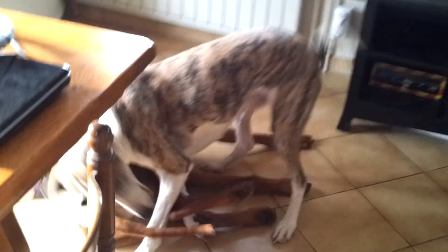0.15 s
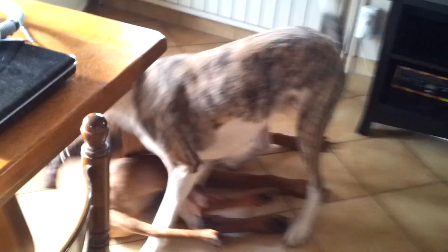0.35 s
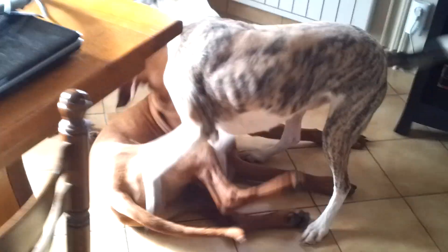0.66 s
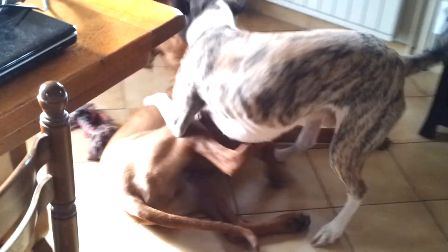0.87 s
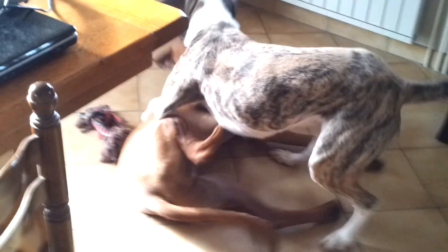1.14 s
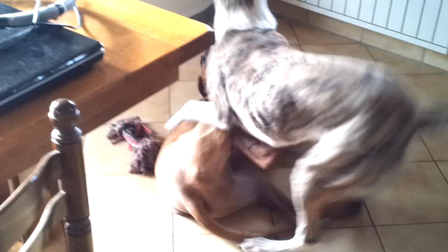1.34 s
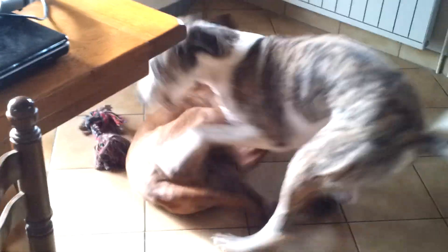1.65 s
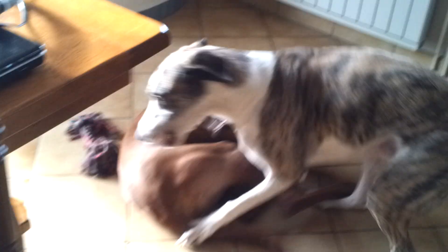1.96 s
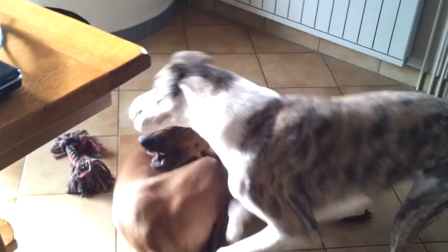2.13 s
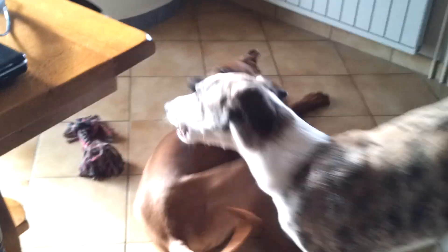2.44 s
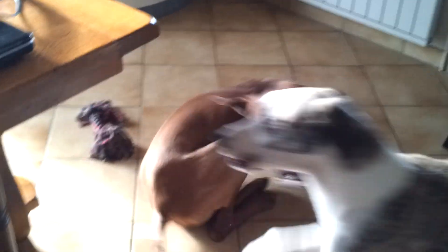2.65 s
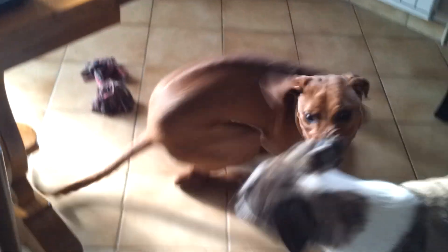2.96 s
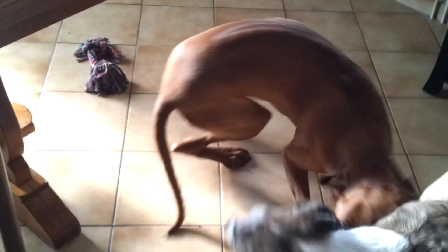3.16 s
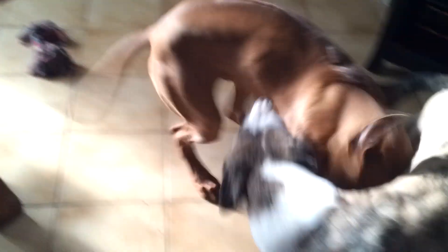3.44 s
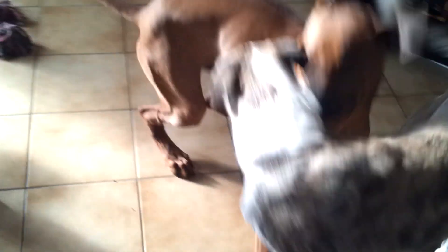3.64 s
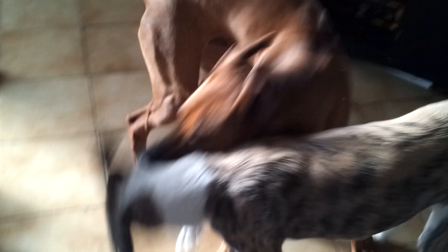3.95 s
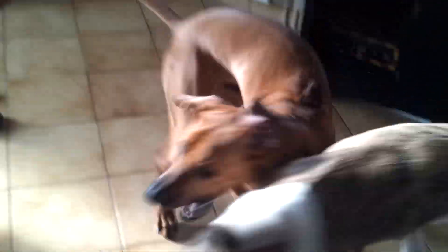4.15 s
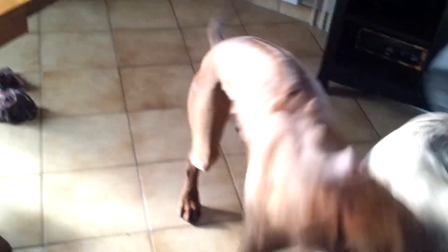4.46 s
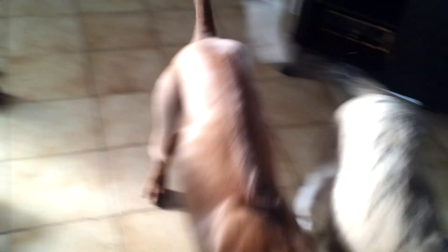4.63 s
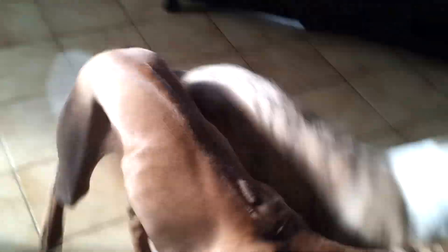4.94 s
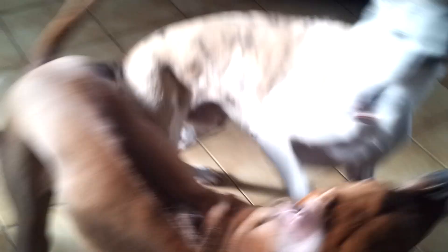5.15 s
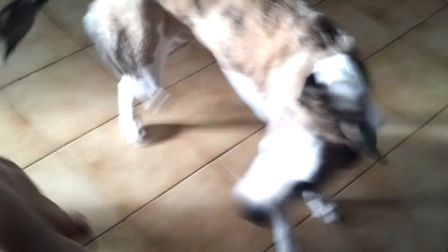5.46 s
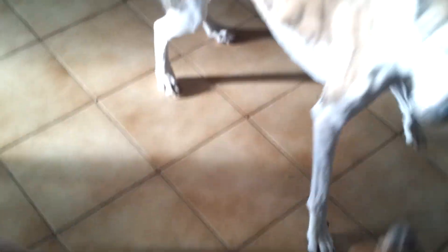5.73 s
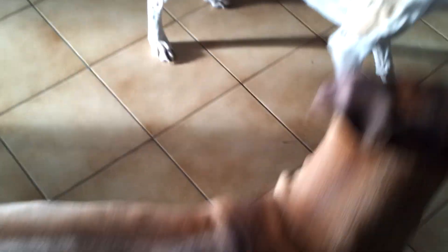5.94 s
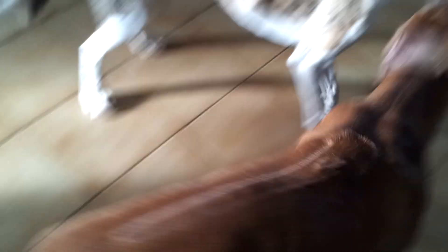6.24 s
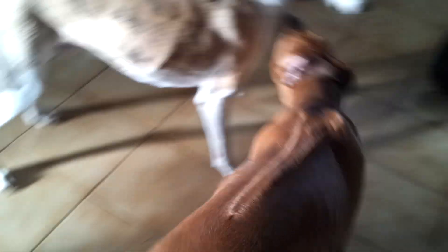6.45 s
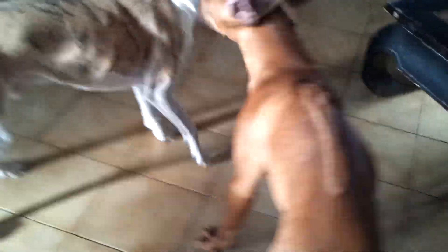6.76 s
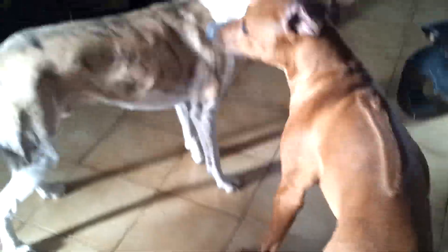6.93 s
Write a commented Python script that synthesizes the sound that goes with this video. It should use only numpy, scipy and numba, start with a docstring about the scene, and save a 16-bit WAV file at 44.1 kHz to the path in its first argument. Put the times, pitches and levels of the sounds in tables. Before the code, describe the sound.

Two dogs wrestle on a tiled floor in a hard, reverberant room, close to the microphone, over faint hiss, coat rustle and low handling rumble. The first second is fairly quiet, with light claw steps, small skids and a short huff around 0.7. A sharp claw click lands near 1.4, then a rough, low growl flutters from 1.65 to 1.9, with a fainter one just after 2. Whiny huffs cluster between 2.1 and 2.9 while claws click loudly and scrape from 2.3 to 4, with soft thumps around 2.6 to 3.2. Another growl rattles at 3.8 to 4.2, amid huffs and a brief whine. Sharp claw ticks and thumps continue near 4.7. At 5.13 a short yelping whine meets a growl that swells into one very loud, two-heave bark at about 5.3 to 5.5, distorted and ringing. Afterwards the echo fades, with scattered claws, a low thump near 6.3 and weak huffs until 7.

```python
"""Two dogs wrestle on a tiled floor in a hard, ringing room, close to the microphone.
Over faint hiss and rustling coats come light steps, huffs, whines and soft thumps, mixed together.
Claws click, noise bursts skid over the tile; rough pulses through a mouth make the growls.
Past five seconds a growl swells into a loud bark, pulses through wide jaws, which overloads
the microphone and rings in the room; the tussle then goes on and dies down."""
import sys
import numpy as np
from scipy import signal
from scipy.fft import rfft, irfft
from scipy.io import wavfile
from numba import njit

SR = 44100
rng = np.random.default_rng(int(sys.argv[2]) if len(sys.argv) > 2 else 0)


def wav_out(sig):
    """Save sig, one row per channel (or a flat mono array), as 16-bit PCM at SR to the path in sys.argv[1]."""
    wavfile.write(sys.argv[1], SR, np.round(np.clip(np.atleast_2d(sig).T, -1, 1) * 32767).astype(np.int16))


N = 312974  # length [samples]
TIME = np.arange(N) / SR  # [s]


def undb(db):
    """Decibels to an amplitude factor."""
    return 10 ** (np.asarray(db) / 20)


def unit(x):
    """Scale to rms 1."""
    return x / np.sqrt(np.mean(x ** 2) + 1e-18)


def add(out, s, sound):
    """Mix a sound in at time s."""
    start = max(int(s * SR), 0)
    out[start:start + len(sound)] += sound[:max(N - start, 0)]


def colour(x, points):
    """Shape a sound with a spectrum of (frequency [Hz], gain [dB]) points."""
    hz, db = np.transpose(points)
    bins = np.maximum(np.fft.rfftfreq(len(x), 1 / SR), 1)
    gain_db = np.interp(np.log(bins), np.log(hz), db)
    return irfft(rfft(x) * undb(gain_db), len(x))


@njit
def svf(x, g, k):
    """State-variable band-pass whose centre and width may move."""
    y, band, low = np.empty(len(x)), 0., 0.
    for i in range(len(x)):
        # the 1e-18 keeps the filter away from very small numbers in silence
        v = (band + g[i] * (x[i] + 1e-18 - low)) / (1 + g[i] * (g[i] + k[i]))
        band, low, y[i] = 2 * v - band, low + 2 * g[i] * v, k[i] * v
    return y


def resonate(x, hz, width_hz):
    """One resonance, gain 1 at its centre."""
    hz = np.minimum(hz, SR * .45) * np.ones(len(x))
    return svf(x, np.tan(np.pi * hz / SR), width_hz / hz)


def throat(x, modes):
    """Parallel resonances of alternating sign."""
    out = 0
    for k, (hz, width, db) in enumerate(modes):
        out = out + (-1) ** k * undb(db) * resonate(x, hz, width)
    return out


def highpass(x, hz):
    """Remove what lies below hz."""
    return signal.sosfilt(signal.butter(4, hz, "high", fs=SR, output="sos"), x)


def grains(count, rate, spread_db):
    """Random tiny impacts of uneven size, rate per second on average."""
    hit = rng.random(count) < rate / SR
    sign = rng.choice([-1, 1], count)
    size = undb(spread_db * np.clip(rng.standard_normal(count), -2, 2))
    return unit(hit * sign * size)


def swell(length, attack):
    """Envelope that rises quickly, holds for about its length [s] and dies away."""
    t = np.arange(int(2 * max(length, .005) * SR)) / SR
    return (1 - np.exp(-t / attack)) * np.exp(-(t / length) ** 3)


def fade(x, length):
    """Ease a call in and out over length [s]."""
    t = TIME[:len(x)]
    return x * np.minimum(np.minimum(t, t[::-1]) / length, 1)


def controls(table):
    """Sample a curve table's columns over its own span."""
    s, *columns = np.transpose(table)
    t = np.arange(s[0], s[-1], 1 / SR)
    return [np.interp(t, s, c) for c in columns]


def larynx(hz, jitter, shimmer_db, limp, breath):
    """Uneven glottal pulses, alternately strong and weak, each followed by a puff of air."""
    chance = rng.standard_normal((256, 2))
    cycle = (np.cumsum(hz) / SR).astype(int)
    phase = np.cumsum(hz * np.exp(jitter * chance[cycle, 0])) / SR
    cycle = phase.astype(int)
    size = undb(shimmer_db * chance[cycle, 1]) * (1 + limp * (-1.) ** cycle)
    pulses = np.diff(cycle, prepend=0) * size
    puff = np.exp(-(phase % 1) / 0.46)
    air = rng.standard_normal(len(hz)) * puff * size
    return unit(pulses) + breath * unit(air)


# faint, steady room noise: (frequency [Hz], relative density [dB per Hz])
HISS_COLOUR = [(15, -36), (25, -1.5), (298, -1), (340, -12), (386, 6), (1010, -8), (1770, -3.5), (3050, -6),
               (5820, -6), (12000, -15.5), (15600, -40), (22000, -120)]


def hiss():
    """The quiet room around the microphone: steady coloured noise."""
    return unit(colour(rng.standard_normal(N), HISS_COLOUR)) * undb(-57)


# how hard the dogs tussle, which sets the rustle and the light steps: (time [s], level [dB])
TUSSLE = [(0.0, -59), (0.51, -62.5), (1.38, -48), (1.72, -55), (1.82, -43), (2.19, -48), (3.12, -42.5),
          (3.76, -50), (4.09, -44.5), (4.27, -52), (4.66, -53), (4.78, -43.5), (5.14, -50.5), (5.34, -58),
          (5.46, -34), (6.07, -59.5), (6.62, -47), (7.1, -65)]


def tussle_db(t):
    """Level of the tussle at time t."""
    return np.interp(t, *np.transpose(TUSSLE))


# tone of the rubbing coats, with low rumble of the handled microphone: (frequency [Hz], gain [dB])
FUR_COLOUR = [(40, 8), (150, 3.5), (400, 1), (1000, -4), (2400, -4.5), (3800, -5.5), (6500, 1.5),
              (11000, -13.5)]
FUR_DB = 6.5  # above the tussle level


def fur():
    """Fine rustle of coats rubbing and low rumble of the handled microphone, as many tiny impacts."""
    rustle = colour(grains(N, rate=2000, spread_db=-2.0), FUR_COLOUR)
    return unit(rustle) * undb(tussle_db(TIME) + FUR_DB)


STEPS_PER_S, STEP_HZ, STEP_SKID_S = 8.8, 7040, 0.066  # mean rate, middle claw ring [Hz], skid length [s]
STEP_CLAW_DB, STEP_SKID_DB = 14, -2  # relative to the tussle level, before each step's own scatter


def light_steps():
    """Rows like PAWS for the shuffling in between: uneven in time, louder as the tussle grows."""
    chance = rng.random((100, 3))
    times = (np.arange(len(chance)) + chance[:, 0]) / STEPS_PER_S
    levels = tussle_db(times) + 5 * (chance[:, 1] - .5)
    rings = STEP_HZ * 2 ** (0.33 * (chance[:, 2] - .5))
    return [(s, db + STEP_CLAW_DB, hz, db + STEP_SKID_DB, STEP_SKID_S)
            for s, db, hz in zip(times, levels, rings) if s < N / SR]


# a dog huffs or whines, levels before the room:
# (time [s], length [s], level [dB], mouth resonance [Hz], whine share [0-1])
HUFFS = [(.01, 0.056, -50.5, 930, 0.2), (.701, 0.037, -35, 616, 0.18), (1.069, 0.23, -47, 990, 0.08),
         (1.553, 0.033, -36, 850, .2), (1.633, 0.071, -35.5, 920, 0.01), (2.102, 0.029, -36, 1337, 0.6),
         (2.129, 0.049, -37, 900, 0.8), (2.37, 0.099, -34, 999, 0.73), (2.414, 0.22, -38.5, 1070, 0.15),
         (2.672, 0.056, -29, 930, 0.72), (2.789, 0.092, -41.5, 886, 0.4), (2.879, 0.053, -31, 756, 0),
         (3.54, 0.05, -36, 790, 0), (3.78, 0.032, -32, 1023, 0.1), (4.107, 0.056, -34, 1096, 1),
         (4.175, 0.097, -34.5, 1210, 0), (4.365, 0.031, -39, 793, 0), (4.471, 0.0287, -36, 873, 0),
         (4.575, .15, -37.5, 756, 0.03), (4.9, 0.048, -34, 710, 0), (5.051, 0.052, -35.5, 766, 0),
         (5.125, 0.019, -19.5, 856, .95), (6.273, 0.13, -42.5, 810, 0), (6.686, .17, -45, 880, 0)]
# upper resonances of a huff: (frequency [Hz], width [Hz], gain [dB])
HUFF_THROAT = [(1880, 190, 11.5), (2500, 280, 3.5)]
UPPER_DB, UPPER_WHINE_DB = -6.5, -26  # upper resonances in a plain huff, and their change in a pure whine


def huffs():
    """Fluttering air rings the dog's mouth; when the throat tightens it narrows into a thin, sagging whine."""
    out, air = np.zeros(N), grains(N, rate=3000, spread_db=1.5)
    for s, length, db, hz, whine in HUFFS:
        whine = np.clip(whine, 0, 1)
        upper_db = UPPER_DB + UPPER_WHINE_DB * whine
        shape = swell(length, attack=0.0055 + 0.0087 * whine)
        flow = np.roll(air, -int(s * SR))[:len(shape)]
        bent_hz = hz * np.linspace(1.04, .9, len(shape))
        mouth = unit(resonate(resonate(flow, bent_hz, width_hz=900), bent_hz, width_hz=680))
        tone = unit(resonate(resonate(flow, bent_hz, width_hz=58), bent_hz, width_hz=140))
        upper = unit(resonate(throat(flow, HUFF_THROAT), 2200, width_hz=1700))
        chest = unit(resonate(resonate(flow, 534, width_hz=100), 373, width_hz=120))
        huff = np.sqrt(1 - whine) * (mouth + undb(-7) * chest)
        sound = huff + np.sqrt(whine) * tone + undb(upper_db) * upper
        add(out, s, unit(sound) * shape * undb(db))
    return out


# soft low thumps: a paw or flank on the floor, or a hand moving the microphone, levels before the room:
# (time [s], length [s], level [dB], body resonance [Hz])
THUMPS = [(.135, .013, -48, 150), (0.872, 0.04, -42.5, 128), (1.296, 0.063, -41.5, 138),
          (1.376, 0.065, -37.5, 122), (2.58, 0.054, -30.5, 185), (2.597, 0.077, -36, 65),
          (2.793, .07, -32.5, 150), (2.9, .044, -31.5, 215), (3.143, 0.04, -27.5, 202),
          (3.19, .06, -36.5, 50), (4.631, 0.028, -34, 210), (4.714, 0.046, -37.5, 190),
          (4.83, 0.19, -45, 120), (4.912, 0.054, -38, 290), (6.299, 0.096, -37, 174),
          (6.337, 0.069, -29, 57.6)]


def thumps():
    """Soft contacts on the floor or the microphone: a low, well damped body resonance."""
    out = np.zeros(N)
    for s, length, db, hz in THUMPS:
        shape = swell(length, attack=0.0014)
        push = rng.standard_normal(SR)[:len(shape)]
        body = resonate(resonate(push, hz, width_hz=.7 * hz), hz, width_hz=2 * hz)
        add(out, s, unit(body) * shape * undb(db))
    return out


# a paw strikes the tile and skids, levels before the room:
# (time [s], first claw peak [dB], claw ring [Hz], skid level [dB], skid length [s])
PAWS = [(.298, -43, 6200, -49.5, 0.019), (0.585, -34, 5370, -43.5, 0.14), (1.067, -48, 7200, -43, 0.11),
        (1.213, -37, 6900, -37, 0.067), (1.374, -6.5, 7000, -39.5, 0.066), (1.675, -25, 5270, -41.5, 0.081),
        (1.782, -30, 7360, -35, 0.051), (1.864, -33, 7900, -32.5, 0.068), (2.2995, -12.5, 5170, -28, 0.039),
        (2.57, -17, 5530, -28, 0.075), (2.781, -19, 6200, -27, 0.016), (2.786, -4, 6960, -44, .03),
        (2.8986, -5.5, 6950, -18, 0.015), (3.083, -25, 5300, -28.5, 0.097), (3.131, -6, 7700, -20.5, 0.019),
        (3.205, -16, 5700, -29, 0.073), (3.39, -8.5, 5940, -28, 0.059), (3.454, -15.5, 7150, -35.5, 0.11),
        (3.707, -32.5, 6300, -36.5, 0.06), (3.797, -27, 6540, -33.5, 0.035),
        (3.883, -7.5, 6800, -23.5, 0.019), (4.046, -23, 6200, -21.5, 0.0087),
        (4.623, -10.5, 7440, -26, 0.029), (4.7163, -3.5, 6140, -23, 0.0088),
        (4.822, -21.5, 6700, -35.5, 0.055), (4.952, -19, 6600, -44.5, .022),
        (5.066, -27, 7400, -38.5, 0.034), (5.131, -33.5, 7500, -40.5, 0.18),
        (5.288, -33, 5660, -22.5, 0.17), (5.453, -19, 7450, -19.5, 0.03), (5.8012, -15.5, 6500, -25, 0.03),
        (5.97, -28, 6000, -40, .085), (6.202, -38.5, 6530, -34.5, 0.036), (6.226, -24, 6440, -34.5, 0.049),
        (6.299, -35, 6700, -40.5, 0.069), (6.529, -26, 6800, -30, 0.039), (6.581, -28, 7000, -35, .03),
        (6.679, -38, 7000, -43, 0.094), (6.868, -26, 6600, -50, 0.019)]
# each later toe is softer and, give or take the random scatter, later
TOE_FALL_DB, TOE_GAP_S, TOE_SCATTER_S = 7.5, .003, .005


def claws(paws):
    """Each claw gives a very short ring; two more toes land more softly close by in time."""
    out, t = np.zeros(N), np.arange(256) / SR
    for s, db, hz, _, _ in paws:
        for toe in range(3):
            lag, own = rng.random(), rng.standard_normal()
            contact = rng.standard_normal(len(t)) * np.exp(-t / 0.0016)
            ring = resonate(contact, hz * (1 + 0.082 * own), width_hz=2060)
            tick = resonate(ring, hz, width_hz=46000) + 0.066 * contact
            tick = tick / np.abs(tick).max()
            landing = s + toe * (TOE_GAP_S + TOE_SCATTER_S * lag)
            add(out, landing, tick * undb(db - TOE_FALL_DB * toe))
    return out


# tone of a claw dragged over tile: (frequency [Hz], gain [dB])
SKID_COLOUR = [(300, -21), (1000, -15), (2500, -11), (3800, -10), (5200, -3.5), (6800, 2.5), (8500, -6.5),
               (11500, -11.5), (14000, -23)]


def skids(paws):
    """With each strike the claw sticks and slips over the tile in a dense rattle that rings it again."""
    out = np.zeros(N)
    slips = grains(N, rate=1500, spread_db=5)
    rattle = colour(slips, SKID_COLOUR)
    for s, _, hz, db, length in paws:
        shape = swell(length, attack=.0006)
        bite = 1 + 0.63 * np.exp(-TIME[:len(shape)] / 0.0022)  # hardest as the weight lands
        scrape = np.roll(rattle, -int(s * SR))[:len(shape)]
        ring = resonate(scrape, hz, width_hz=1640)
        add(out, s, unit(scrape + undb(-5) * ring) * shape * bite * undb(db))
    return out


# one curve for each throaty growl, levels before the room: (time [s], level [dB], pitch [Hz])
GROWLS = [
    [(1.645, -51, 211.6), (1.679, -25.5, 211.7), (1.713, -31, 205.2), (1.745, -27, 174),
     (1.787, -28.5, 174.9), (1.821, -34.5, 169.5), (1.855, -25.5, 168.8), (1.91, -36, 175.7)],
    [(2.005, -37.5, 131.4), (2.067, -40, 128.7), (2.125, -38, 132)],
    [(3.79, -41.5, 203.1), (3.86, -33.5, 203.2), (3.904, -31, 187.3), (3.938, -28, 192.7),
     (3.98, -38, 176.5), (4.022, -30.5, 175.7), (4.044, -32.5, 175.8), (4.106, -27, 193.9),
     (4.152, -36.5, 188), (4.186, -32.5, 187), (4.22, -35.5, 186)],
    [(5.13, -40, 171.2), (5.144, -29, 169), (5.226, -29.5, 217), (5.268, -23.5, 213), (5.3, -14, 213)],
]
# how each growl is voiced:
# (middle mouth resonance [Hz], deepest alternation [0-1], upper resonances [dB])
GROWL_VOICES = [(486, .5, 4.5), (340, .2, 5), (390, 0.8, 1.5), (570, .3, -5.5)]
# how rough each growl is: (pitch jitter [0-1], air relative to the pulses [0-1])
GROWL_ROUGHNESS = [(.038, .25), (.04, .25), (.032, .22), (.035, .22)]
# upper resonances of the growling throat: (frequency [Hz], width [Hz], gain [dB])
GROWL_THROAT = [(1016, 130, -5), (1590, 220, -13), (2090, 204, -12)]
MOUTH_OCT_PER_DB = -0.45  # the mouth resonance sinks as the growl gets louder
SPLIT_FROM_HZ, SPLIT_FULL_HZ = 125, 208  # higher pitches alternate strong and weak pulses more deeply
GROWL_FADE_S = 0.016


def growls():
    """Slow, rough pulses through a nearly closed mouth; every other pulse weakens and the pitch splits."""
    out = np.zeros(N)
    for table, voicing, (jitter, air) in zip(GROWLS, GROWL_VOICES, GROWL_ROUGHNESS):
        middle_mouth_hz, split, upper_db = voicing
        db, hz = controls(table)
        mouth_hz = middle_mouth_hz * 2 ** (MOUTH_OCT_PER_DB * (db - db.mean()))
        limp = np.interp(hz, [SPLIT_FROM_HZ, SPLIT_FULL_HZ], [0, split])
        source = larynx(hz, jitter=jitter, shimmer_db=3, limp=np.clip(limp, 0, 1), breath=air)
        chest = resonate(source, 141.6, width_hz=72)
        chest = colour(chest, [(35, -6.5), (85, 4.5), (160, 3), (230, 3), (300, 4.0), (1000, -34.5)])
        mouth = undb(-.5) * resonate(resonate(source, mouth_hz, width_hz=110), mouth_hz, width_hz=200)
        pharynx = undb(-6) * resonate(resonate(source, 650, width_hz=120), 650, width_hz=220)
        # the upper resonances weaken steeply where the mouth resonance is low
        upper = throat(source, GROWL_THROAT) * np.minimum(mouth_hz / 490, 1) ** 4
        voice = chest + mouth + pharynx + undb(upper_db) * upper
        voice = colour(voice, [(2400, -17.5), (4000, -9.5), (9000, -29.5)])
        add(out, table[0][0], fade(unit(voice), GROWL_FADE_S) * undb(db))
    return out


# the bark, forced out in two heaves, levels before the room:
# (time [s], pitch [Hz], level [dB], jaw resonance [Hz])
BARK = [(5.27, 217.8, -25.5, 680), (5.295, 218.8, -13, 625), (5.313, 262.3, -1.5, 584),
        (5.338, 175.9, 1, 496), (5.365, 160.2, -.5, 387), (5.415, 192.2, -9, 381), (5.448, 258, -7.5, 476),
        (5.468, 172.8, -16, 380), (5.495, 153.6, -31, 340)]
# upper resonances of the barking throat: (frequency [Hz], width [Hz], gain with half-open jaws [dB])
BARK_THROAT = [(950, 103, -9.5), (1695, 230, -38), (1850, 1700, -35.5), (2613, 143, -19),
               (3140, 350, -31.5), (4630, 740, -33)]
JAW_HALF_OPEN_HZ = 424


def bark():
    """The pitch leaps and breaks in each heave; the jaws start wide, close, and briefly reopen."""
    hz, db, jaw_hz = controls(BARK)
    source = larynx(hz, jitter=.02, shimmer_db=2.5, limp=.3, breath=.17)
    jaw = resonate(resonate(source, jaw_hz, width_hz=238), jaw_hz, width_hz=585)
    # the upper resonances are loudest while the jaws are wide
    upper = throat(source, BARK_THROAT) * (jaw_hz / JAW_HALF_OPEN_HZ) ** 2
    voice = highpass(jaw + upper, hz=243)
    voice = colour(voice, [(2800, -11), (4200, -22.5), (9000, -9.0)])
    out = np.zeros(N)
    add(out, BARK[0][0], unit(voice) * undb(db))
    return out


# standing waves between the walls: (frequency [Hz], time to fall 60 dB [s], gain [dB])
ROOM_MODES = [(273.3, 0.52, 8), (307, 0.61, 10), (372, 0.39, 10), (389.3, 0.62, 9.5), (521.2, 0.83, 9),
              (587, 0.51, 4), (1047, 0.93, 11.5)]


def standing_waves(x):
    """A loud call leaves a few room resonances ringing."""
    out = 0
    for hz, t60, db in ROOM_MODES:
        width_hz = np.log(1000) / np.pi / t60  # longer ringing means a narrower resonance
        out = out + undb(db) * resonate(x, hz, width_hz)
    return out


# how long the echo lasts: (frequency [Hz], time to fall 60 dB [s])
ROOM_T60 = [(60, 0.73), (250, 0.73), (600, 0.76), (2000, 0.69), (6500, 0.65), (12000, 0.58)]


def room():
    """Diffuse echo of tile and plaster from one place, energy 1, each band with its own decay."""
    t = TIME[:int(1.3 * SR)]
    spectrum = np.exp(2j * np.pi * rng.random(len(t) // 2 + 1))
    octave = np.log2(np.maximum(np.fft.rfftfreq(len(t), 1 / SR), 1))
    hz, t60 = np.transpose(ROOM_T60)
    tail = np.zeros(len(t))
    for band, decay in zip(np.eye(len(hz)), t60):
        share = np.interp(octave, np.log2(hz), band)  # overlapping bands that sum to 1
        tail += irfft(spectrum * share, len(t)) * 1000 ** (-t / decay)
    tail *= 1 - np.exp(-t / 0.00083)
    return tail / np.linalg.norm(tail)


def in_room(x, direct_db, room_db):
    """A source heard directly and through the echo of its own place in the room."""
    return x * undb(direct_db) + signal.fftconvolve(x, room())[:N] * undb(room_db)


PLACES = 3  # spots on the floor, taken in turn by the paws


def scene():
    """Hiss, bodies, paws and voices; the paws land at changing places on the floor."""
    call, paws = bark(), PAWS + light_steps()
    bodies = in_room(fur(), -2.5, -3.5) + in_room(thumps(), -2.2, -3.1)
    feet = np.zeros(N)
    for k in range(PLACES):
        here = paws[k::PLACES]
        feet += in_room(skids(here) + claws(here), -0.91, 0.77)
    voices = in_room(huffs(), -3.5, -1.6) + in_room(growls(), -1.2, -2.5)
    voices += in_room(call, -0.65, -3) + standing_waves(call)
    return (hiss() + bodies + feet + voices)[None]


DULL_ABOVE_HZ, TOP_HZ = 11900, 15400  # low-pass edges ahead of the peak flattening and after it


def record(dry):
    """The treble is dull above 12 kHz and loud peaks, as in the bark, are flattened."""
    heard = signal.sosfilt(signal.ellip(8, .2, 60, DULL_ABOVE_HZ, fs=SR, output="sos"), dry)
    ceiling = .71
    clipped = heard / (1 + (heard / ceiling) ** 8) ** (1 / 8)
    clipped = colour(clipped[0], [(11000, 0), (13000, -7)])[None]
    return signal.sosfilt(signal.ellip(8, .2, 70, TOP_HZ, fs=SR, output="sos"), clipped)


dry = scene()
out = record(dry)
wav_out(out)
```